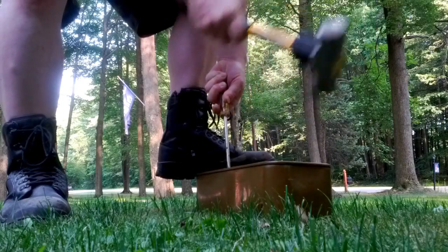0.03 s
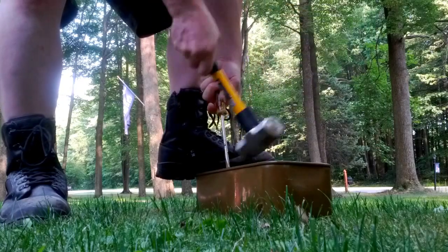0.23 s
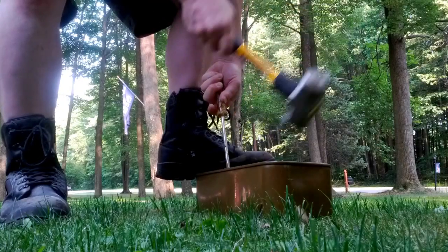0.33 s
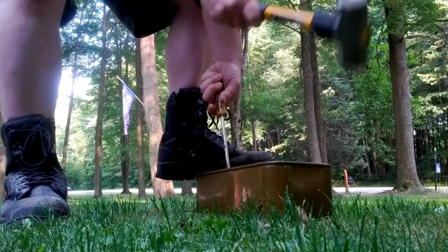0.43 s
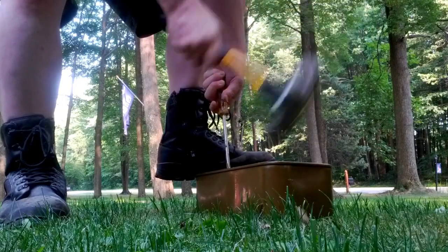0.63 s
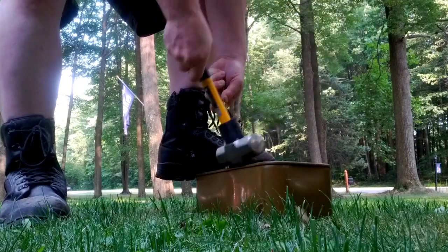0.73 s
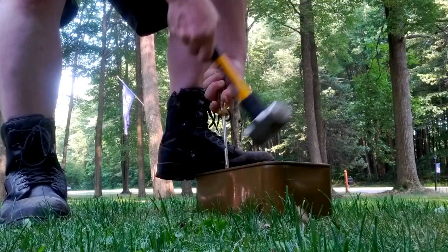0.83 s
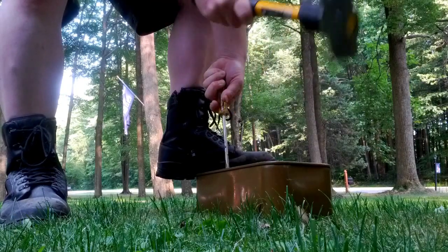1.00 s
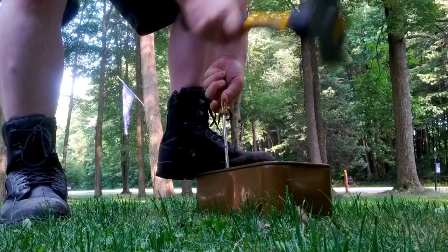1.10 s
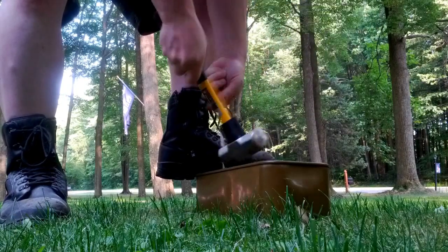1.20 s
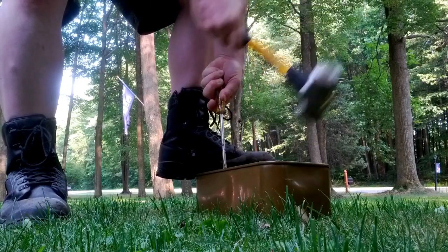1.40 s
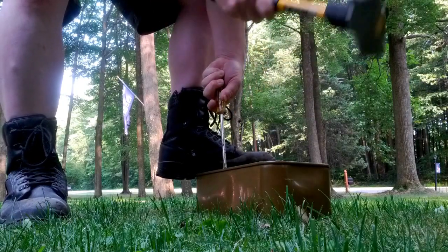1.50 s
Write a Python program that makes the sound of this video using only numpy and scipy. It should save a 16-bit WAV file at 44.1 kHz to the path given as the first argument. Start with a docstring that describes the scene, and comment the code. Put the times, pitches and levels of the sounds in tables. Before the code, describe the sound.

Three evenly spaced hammer blows land on a screwdriver piercing a steel lid outdoors. The sharp clacks and short, hollow clanks slightly overload the close microphone, and each leaves a brief shimmering echo among trees. A faint hum lies behind.

```python
"""A faint distant hum hangs over a lawn. A small sledge hits a screwdriver three times, driving it
through the lid of a steel box. Each blow is a hard steel clack and a short, boot-damped clank of the
box that overload the close microphone. The blade slips further and rings the lid again; then trees
throw back a quick echo and a shimmering tail."""
import sys
import numpy as np
from scipy import signal
from scipy.fft import rfft, irfft
from scipy.io import wavfile
from scipy.ndimage import uniform_filter1d

SR = 44100
rng = np.random.default_rng(int(sys.argv[2]) if len(sys.argv) > 2 else 0)


def generate_wav(sig):
    """Save sig (samples, or channels by samples) to the path in sys.argv[1] as 16-bit PCM at SR."""
    pcm = np.round(np.clip(np.atleast_2d(sig).T, -1, 1) * 32767).astype(np.int16)
    wavfile.write(sys.argv[1], SR, pcm)


N = 68355
T = np.arange(SR) / SR
SLIP_T60_S, TAIL_RISE_S = 0.021, 0.015


# start_s, steel_db, shank_hz, shank_db, sheen_hz, sheen_db, slip_delay_s, slip_db
BLOWS = [(0.2057, 1.5, 6530, 7.5, 6400, 1, 0.0091, -0.5), (0.744, 0, 7376, 1.5, 9300, 8.5, 0.012, 2.5),
         (1.262, 2.5, 7730, -0.5, 8040, 0.5, 0.014, -1.5)]
# freq_hz, level_db
STEEL_SPECTRUM = [(300, -8.5), (2000, -4.5), (3100, -6.5), (4100, 1), (5200, -9), (7000, 0.5),
                  (10500, -7.5), (12700, 1.5), (14500, -7), (17000, -25.5)]

def screwdriver(shank_hz, shank_db, sheen_hz, sheen_db, slip_s, slip_db):
    """Sledge on steel: a clack, a hand-damped shank ring, the blade rattling and scraping in its hole."""
    clack = amp(2) * dense_modes(STEEL_SPECTRUM) * fade(t60_s=0.017)
    shank = amp(shank_db - 3) * sine(shank_hz) * fade(t60_s=0.016)
    rattle = amp(-15) * noise(STEEL_SPECTRUM) * fade(t60_s=0.09)
    scrape = amp(slip_db - 19.5) * noise(STEEL_SPECTRUM) * fade(SLIP_T60_S)
    add(rattle, slip_s, scrape)
    return clack + shank + sheen(rattle, sheen_hz, sheen_db)


def sheen(x, centre_hz, lift_db, width_hz=870):
    """Resonant lift of the treble band that a blow rings most."""
    hz = np.fft.rfftfreq(len(x), 1 / SR)
    response = 1 + (amp(lift_db) - 1) / (1 + 1j * (hz - centre_hz) / width_hz)
    return irfft(rfft(x) * response, len(x))


# modes_db, focus_hz, focus_db, second_focus_hz, second_focus_db, clatter_db, clatter_hz, thud_db, thud_hz
CLANKS = [(0, 1378, 10, 440, 4.5, -4.5, 640, 4.5, 162), (5.5, 1370, 3.5, 760, 2, 1.5, 1300, -7.5, 92),
          (3.5, 672, 6, 370, 6, -3, 450, 1.5, 192.6)]
# pitch_hz, level_db, t60_s
BOX_MODES = [(324.6, -25.5, 0.088), (437.7, -7.5, 0.052), (501.7, -12, 0.062), (583.4, -13, 0.047),
             (645.2, -11, .055), (773, -12.5, .05), (897.6, -16.5, .05), (1003.5, -11.5, 0.04),
             (1181, -17.5, .06), (1375, -10, 0.044), (1857, -24, .06), (2238, -19.5, 0.047)]

def box(clank, slip_s, slip_db, focus_width_hz=70, slip_highpass_hz=620, rise_s=0.002):
    """The lid rings and clatters, again as the blade slips, while the box thuds into the turf."""
    modes_db, focus_hz, focus_db, second_hz, second_db, clatter_db, clatter_hz, thud_db, thud_hz = clank
    slip_envelope = amp(slip_db - 10) * fade(SLIP_T60_S) * rise(rise_s)
    ring = np.zeros(SR)
    for k, (hz, db, t60_s) in enumerate(BOX_MODES):
        db += focus_db * bell(hz - focus_hz, focus_width_hz)
        db += second_db * bell(hz - second_hz, focus_width_hz)
        envelope = fade(t60_s)
        add(envelope, slip_s, slip_envelope / (1 + (slip_highpass_hz / hz) ** 4))
        ring += (-1) ** k * amp(db) * sine(hz) * envelope
    clatter = lid_clatter(clatter_db, clatter_hz, slip_s, slip_db)
    thud = amp(thud_db - 5.5) * sine(thud_hz) * fade(t60_s=0.025)
    return (amp(modes_db) * ring + clatter + thud) * rise(rise_s)


# freq_hz, level_db
CLATTER_SPECTRUM = [(60, -17.5), (250, -12.5), (450, -0.5), (900, -1), (1450, -4), (2000, -12.5),
                    (3000, -17.5), (6000, -36.5), (16000, -55.5)]

def lid_clatter(level_db, centre_hz, slip_s, slip_db, lift_db=3.5, width_oct=0.31):
    """Crowded lid modes, excited by the blow and by the slip."""
    spectrum = [(hz, db + lift_db * bell(np.log2(hz / centre_hz), width_oct))
                for hz, db in CLATTER_SPECTRUM]
    clatter = amp(level_db) * dense_modes(spectrum) * fade(t60_s=0.053)
    add(clatter, slip_s, amp(slip_db - 9.5) * dense_modes(spectrum) * fade(SLIP_T60_S))
    return clatter


# low_echo_db, bright_echo_db, low_tail_db, low_tilt_db_per_oct, bright_tail_db, bright_tilt_db_per_oct,
# sheen_db, sheen_width_hz, shank_db
TREE_RETURNS = [(-5, -2, -5, 2, -2, 1.5, -1, 920, -18), (0, 1, 2.5, 1.5, -3, -1.5, 1, 1100, -2),
                (-3.5, 4.5, -3.5, 0, 0.5, -1, 0.5, 610, -12)]
# freq_hz, level_db
LOW_ECHO_SPECTRUM = [(60, -13), (200, -9.5), (300, -3), (500, -9.5), (900, -1.5), (1400, -7.5),
                     (2000, -16.5), (4000, -32.5), (16000, -61.5)]
BRIGHT_ECHO_SPECTRUM = [(500, -6.5), (2500, -8), (4200, 1.5), (5300, -1.5), (7500, 3), (10000, -0.5),
                        (12300, 6.5), (14000, -5), (16000, -18.5)]
# freq_hz, level_db, t60_s
LOW_TAIL_BANDS = [(60, 2, .5), (200, -7.5, .5), (330, -4.5, 0.98), (520, 1, 0.56), (750, 1.5, 0.51),
                  (1050, -0.5, 0.44), (1400, -8, 0.43), (2000, -23.5, 0.67), (8000, -42.5, .4)]
BRIGHT_TAIL_BANDS = [(500, 1.5, .6), (2200, -2.5, 0.43), (3000, -6, 0.74), (4000, -3, 1),
                     (5200, -1.5, 0.42), (7000, -3.5, .75), (10000, 4.5, 0.42), (12500, 0.5, 0.67),
                     (14000, -6.5, .5), (16000, -8.5, .4)]

def trees(tree_return, shank_hz, sheen_hz, delay_s=0.045, spread_s=0.006):
    """A cluster of echoes from the nearest trunks, then scatter from the wood beyond."""
    (low_echo_db, bright_echo_db, low_tail_db, low_tilt, bright_tail_db, bright_tilt,
     sheen_db, sheen_width_hz, shank_db) = tree_return
    echo = amp(low_echo_db - 22) * dense_modes(LOW_ECHO_SPECTRUM)
    echo += amp(bright_echo_db - 27.5) * noise(BRIGHT_ECHO_SPECTRUM)
    echo *= np.exp(-abs(T - delay_s) / spread_s)
    tail = amp(low_tail_db - 27) * scatter(LOW_TAIL_BANDS, low_tilt)
    tail += amp(bright_tail_db - 32.5) * scatter(BRIGHT_TAIL_BANDS, bright_tilt)
    ring = amp(sheen_db - 40) * scattered_ring(sheen_hz, sheen_width_hz)
    ring += amp(shank_db - 40) * scattered_ring(shank_hz, width_hz=600)
    return echo + tail + ring


def scatter(bands, tilt_db_per_oct):
    """Diffuse sound that swells, then dies at its own rate in each band."""
    spectrum = [(hz, db + tilt_db_per_oct * np.log2(hz)) for hz, db, _ in bands]
    hz, t, frames = signal.stft(noise(spectrum), SR, nperseg=256)
    frames *= fade(lookup(bands, hz, column=2)[:, None], t)
    _, tail = signal.istft(frames, SR, nperseg=256)
    return tail[:SR] * rise(TAIL_RISE_S)


def scattered_ring(centre_hz, width_hz):
    """A steel ring smeared into a narrow noise band by scattering."""
    hz = np.fft.rfftfreq(SR, 1 / SR)
    band = irfft(rfft(rng.standard_normal(SR)) * bell(hz - centre_hz, width_hz), SR)
    return unit(band) * fade(t60_s=0.65) * rise(TAIL_RISE_S)


# freq_hz, level_db
AIR_SPECTRUM = [(20, -12.5), (60, 3), (130, -6), (200, -5), (280, -9.5), (400, -16), (750, -15.5),
                (1250, -22.5), (1500, -15.5), (1800, -28), (2500, -29.5), (2750, -25), (3100, -32),
                (5000, -34.5), (5800, -25), (6800, -36), (10000, -29), (15500, -36), (17000, -46)]

def outdoors(hum_hz=118.8, whine_hz=2740, waver_depth=0.008):
    """Quiet air and a distant wavering hum with a thin whine."""
    waver = unit(uniform_filter1d(uniform_filter1d(rng.standard_normal(N), size=3000), size=3000))
    phase_per_hz = 2 * np.pi * np.cumsum(1 + waver_depth * waver) / SR
    air = amp(-48) * noise(AIR_SPECTRUM, size=N)
    hum = amp(-50) * unit(np.sin(hum_hz * phase_per_hz))
    whine = amp(-73.5) * unit(np.sin(whine_hz * phase_per_hz))
    return air + hum + whine


def dense_modes(spectrum, size=1024):
    """Evenly spaced plate modes of random phase under a spectrum."""
    hz = np.fft.rfftfreq(size, 1 / SR)
    modes = amp(lookup(spectrum, hz)) * np.exp(2j * np.pi * rng.random(len(hz)))
    return np.resize(unit(irfft(modes)), SR)


def noise(spectrum, size=SR):
    """Shaped noise, rms 1."""
    gain = amp(lookup(spectrum, np.fft.rfftfreq(size, 1 / SR)))
    return unit(irfft(rfft(rng.standard_normal(size)) * gain, size))


def lookup(table, hz, column=1):
    """Interpolates a column over log frequency."""
    rows = np.array(table)
    return np.interp(np.log(hz + 1), np.log(rows[:, 0] + 1), rows[:, column])


def amp(db):
    return 10 ** (np.asarray(db) / 20)


def unit(x):
    return x / np.sqrt(np.mean(x ** 2) + 1e-20)


def sine(hz):
    return np.sin(2 * np.pi * hz * T)


def bell(offset, width):
    return np.exp(-(offset / width) ** 2)


def rise(tau_s):
    return 1 - np.exp(-T / tau_s)


def fade(t60_s, t=T):
    return np.exp(-np.log(1000) * t / t60_s)


def add(mix, start_s, sound):
    part = mix[round(start_s * SR):][:len(sound)]
    part += sound[:len(part)]


def scene():
    """Three blows and their echoes over the outdoor background, mono."""
    mix = outdoors()
    for blow, clank, tree_return in zip(BLOWS, CLANKS, TREE_RETURNS):
        start_s, steel_db, shank_hz, shank_db, sheen_hz, sheen_db, slip_s, slip_db = blow
        steel = screwdriver(shank_hz, shank_db, sheen_hz, sheen_db, slip_s, slip_db)
        add(mix, start_s, amp(steel_db) * steel)
        add(mix, start_s, box(clank, slip_s, slip_db))
        add(mix, start_s, trees(tree_return, shank_hz, sheen_hz))
    return mix[None]


def record(dry, knee=12, gain_db=1, cutoff_hz=15850):
    """Microphone overload with a firm knee, then a low-pass."""
    clipped = dry / (1 + abs(dry) ** knee) ** (1 / knee)
    lowpass = signal.firwin(255, cutoff_hz, window=("kaiser", 8), fs=SR)
    return amp(gain_db) * signal.oaconvolve(clipped, lowpass[None], "same")


dry = scene()
out = record(dry)
generate_wav(out)
```